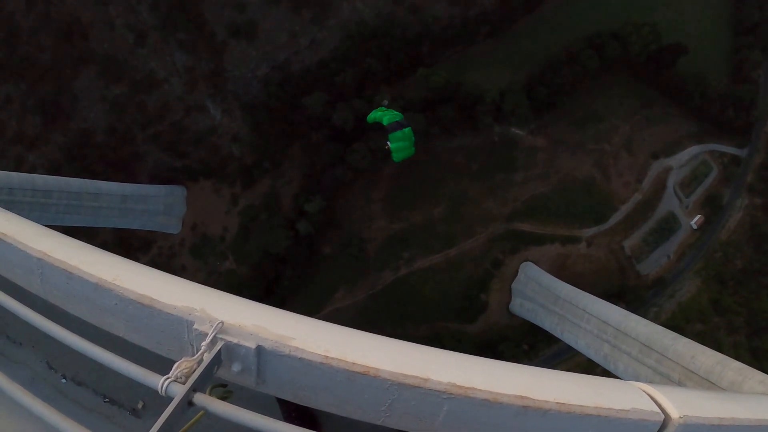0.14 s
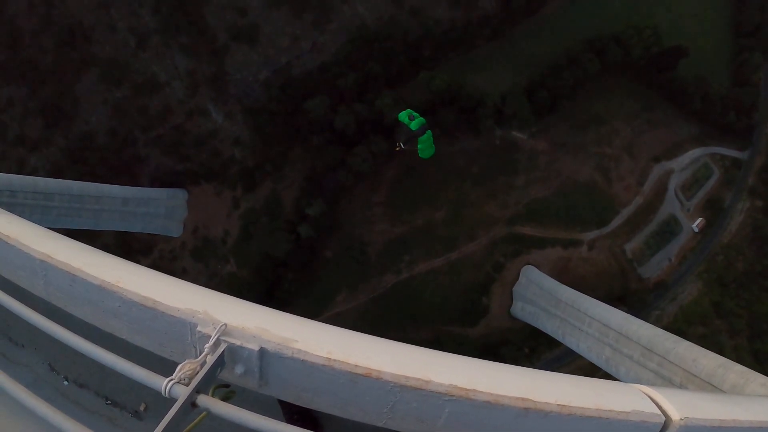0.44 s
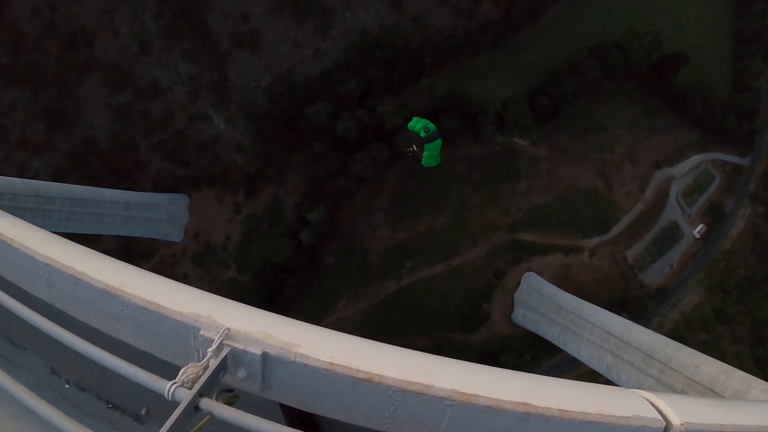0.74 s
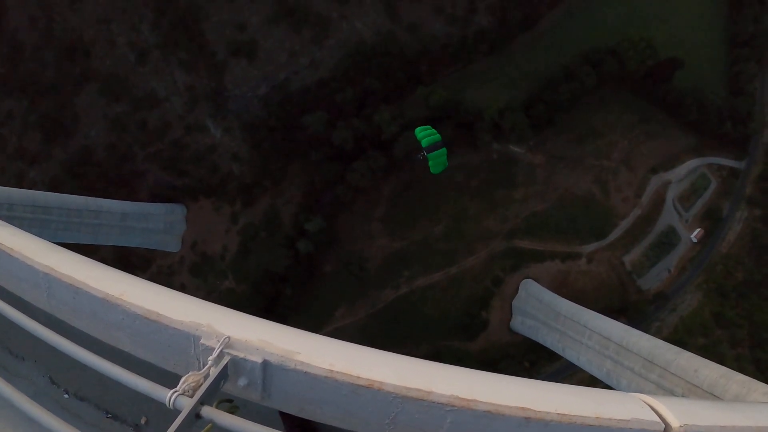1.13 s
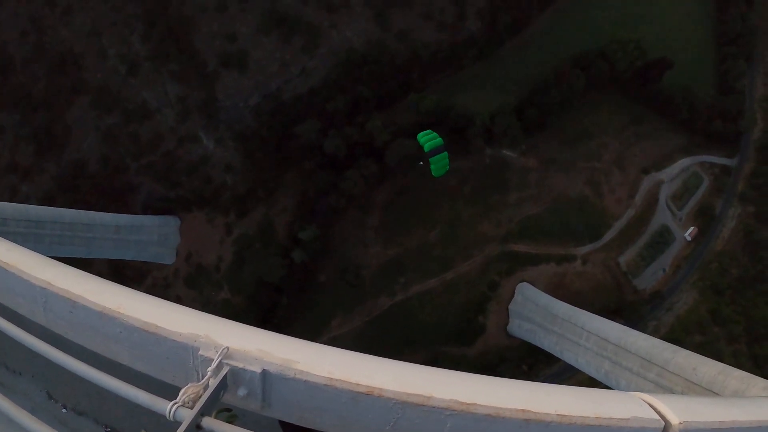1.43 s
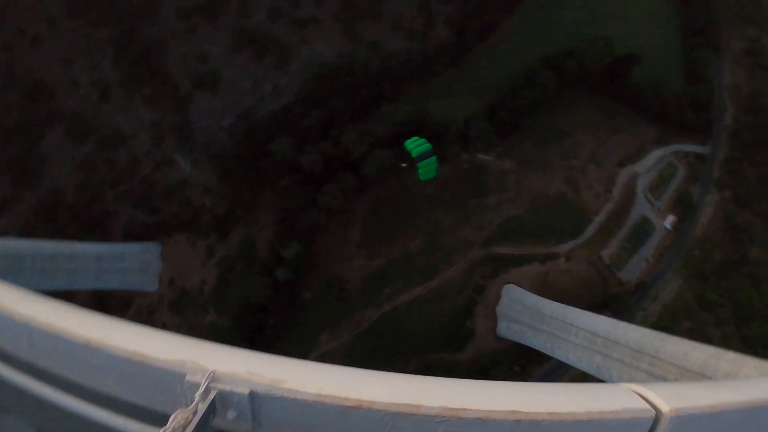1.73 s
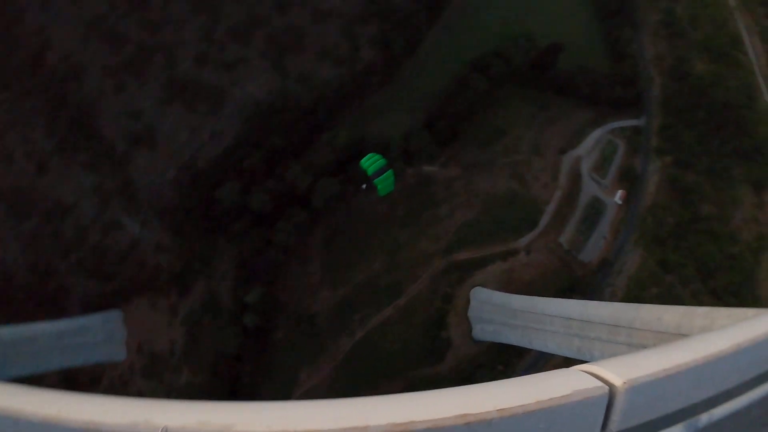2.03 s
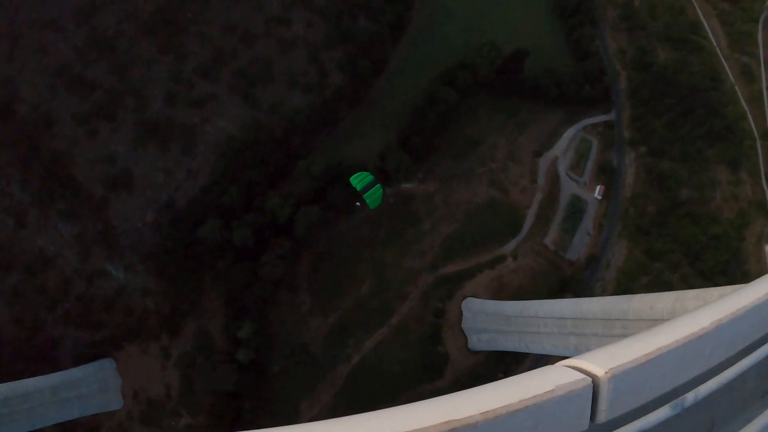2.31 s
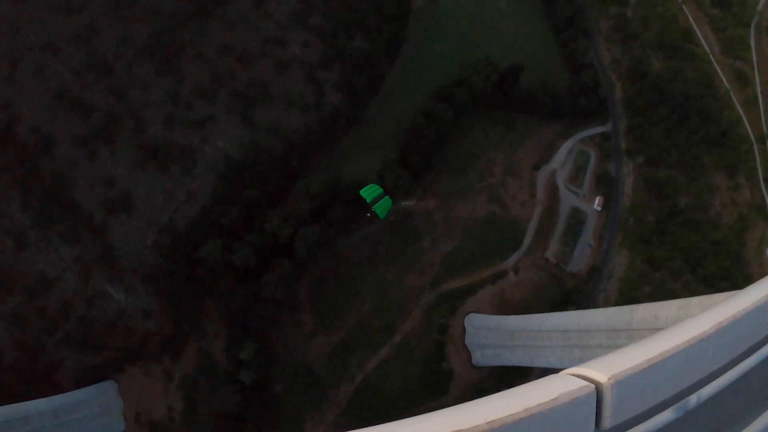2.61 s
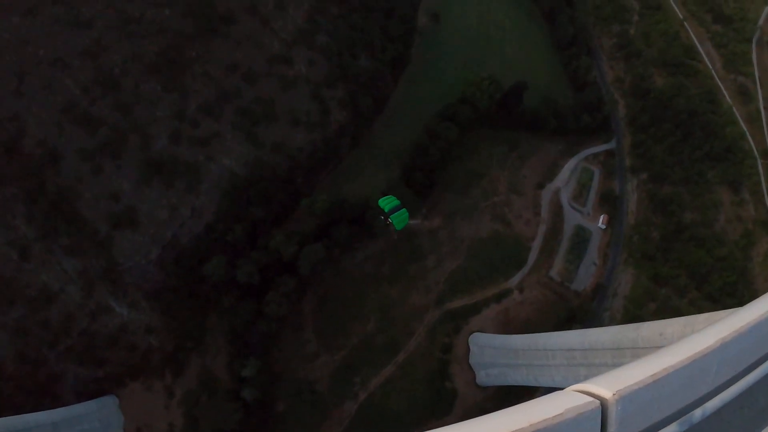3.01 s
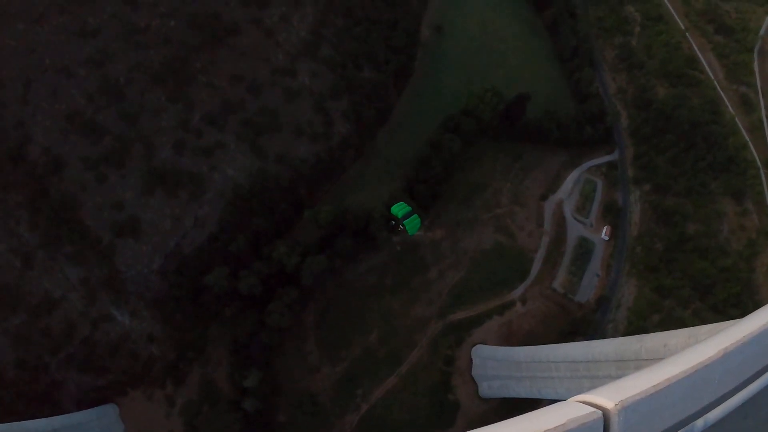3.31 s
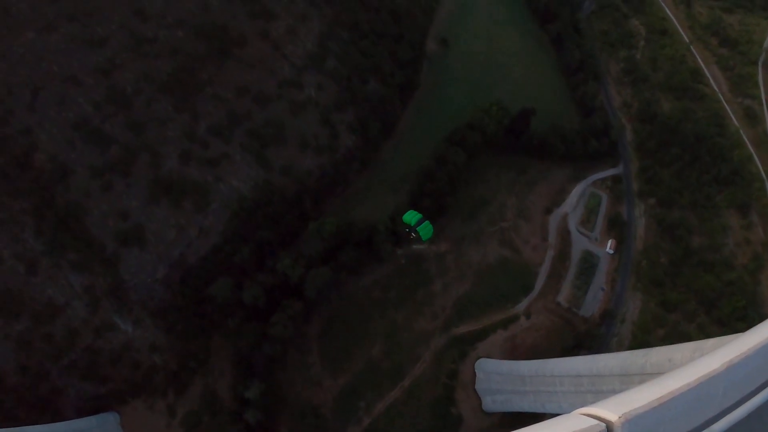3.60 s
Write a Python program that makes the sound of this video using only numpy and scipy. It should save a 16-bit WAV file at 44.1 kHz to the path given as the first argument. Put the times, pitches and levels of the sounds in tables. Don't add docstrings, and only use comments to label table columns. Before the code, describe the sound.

Parachute canopy cracks open with a brief flapping roar, then tyre hiss and low bridge drone.

```python
import sys
import numpy as np
from scipy import signal
from scipy.io import wavfile
from scipy.ndimage import uniform_filter1d, map_coordinates

SR = 44100
rng = np.random.default_rng(int(sys.argv[2]) if len(sys.argv) > 2 else 0)


def master(y):
    cut = np.clip(np.atleast_2d(y).T, -1, 1)
    pcm = np.round(cut * 32767)
    wavfile.write(sys.argv[1], SR, pcm.astype(np.int16))


def linear_from_db(decibels):
    return 10 ** (np.asarray(decibels, float) / 20)


N = 165375

# start_s, level_db
CANOPY_OPENING = [
    (0, -48),
    (.1, -42),
    (.245, -26.5),
    (.325, -21.5),
    (.352, -22.5),
    (.38, -24),
    (.485, -30.5),
    (.525, -38),
    (.8, -62),
]
# freq_hz, density_db (per Hz)
ROAR_COLOUR = [(50, -8.5), (200, -6), (400, -10), (1100, -12.5), (2400, -22), (3500, -21.5), (7500, -33.5),
               (15000, -41)]
# freq_hz, likeness (1 = same)
ROAR_LIKENESS = [(60, 1), (250, 0.99), (1000, 0.97), (3000, 0.9), (5000, 1), (7000, 0.32), (10000, .02)]
# centre_s, lift_db
CLOTH_WHIPS = [(0.138, 3), (0.155, 5), (.172, 3), (.192, 4.5), (0.226, 2.5), (0.239, 3.5), (0.254, 5.5),
               (0.271, 6), (.292, 2), (0.315, 5), (0.326, 2.5), (0.336, -2.5), (0.362, -2), (.375, 3.5),
               (0.39, 3.5), (0.401, -1), (0.423, 4.5), (0.438, -1.5), (0.458, 3), (0.482, 2.5), (.495, -2),
               (0.511, 1.5), (0.551, 4), (0.586, 3.5), (0.604, 3.5), (.634, 2)]
# freq_hz, width_hz, gain_db
ROAR_RIDGES = [
    (742, 170, -3),
    (926, 83, 3),
    (1407, 150, -8.5),
    (1590, 150, 1),
    (2083, 160, -3.5),
    (2750, 310, 4),
]
# crest_s, peak_db, pitch_hz
CELL_SLAMS = [(.065, -21.5, 292), (.1932, -7, 241), (.198, -5.5, 220), (.211, -16, 300), (.225, -19, 200),
              (0.2435, -1.5, 230), (0.263, -26, 250), (0.2659, -0.5, 183), (0.2841, 0, 210),
              (0.2919, -4.5, 280), (0.2975, -7, 280), (.305, 2, 210), (0.311, -7, 200), (0.3156, -5, 220),
              (0.3206, -3.5, 220), (.334, -2.5, 182), (0.369, -13, 250), (0.373, -8.5, 240),
              (0.38, -5.5, 225), (0.385, -7.5, 250), (0.406, -11.5, 139), (0.429, -22, 180),
              (0.569, -29, 150), (0.599, -23.5, 180)]
# start_s, peak_db, pitch_hz, pan_db (left over right)
CLOTH_SNAPS = [(0.041, -33, 2550, 1), (.068, -50, 2520, -5), (.097, -31, 2800, 5), (0.251, -19, 2670, 8),
               (0.4, -13.5, 5000, 3), (.459, -8.5, 3290, 5), (0.545, -32, 2750, 5), (0.604, -25.5, 2480, 3),
               (0.66, -37, 4200, -4), (0.693, -34, 3630, -5), (0.738, -36, 2600, 2), (0.81, -47, 6720, .4),
               (0.831, -39, 3960, -8), (0.8546, -31, 1107, 1), (1.233, -42, 5400, -1),
               (1.383, -35, 2950, 1.1), (2.212, -38.5, 4750, 6.5), (2.301, -46, 4300, 11),
               (2.448, -38, 2080, 2), (2.467, -33.5, 4620, 0.5), (2.4669, -36, 3000, -1),
               (2.466, -41, 9300, 1), (.634, -35, 1710, -3)]
# start_s, level_db, brightness_db, top_air_db, pan_db (left over right), tread_hum_db
PASSING_CARS = [(0, -38, -21, 9.5, 0.5, 0.5), (.6, -35, -10, 3.5, -1.5, -4), (.8, -47, -2, 8, 7.5, 0),
                (1.4, -41, -1.5, 12.5, 7.5, -5.5), (1.68, -40, 1.5, 7, 11, 0), (1.8, -40, 0, -2, 11, 3.8),
                (1.95, -38, -1, 6.5, 8, 5), (2.15, -38, 1.5, 9.5, 8, 1.5), (2.5, -37.5, -3, -6, 6.5, -4.5),
                (2.9, -39, -5, -14.5, 6, 1), (3.15, -36.5, -2.5, -1, 5.5, -3), (3.3, -36, 0, -4, 6, -2.5),
                (3.42, -36, 3, 5, 6, -1), (3.58, -36.5, 1.5, 1, 7, -3), (3.75, -36, -0.5, -1.5, 6.5, 1)]
# freq_hz, density_db (per Hz)
TYRE_COLOUR = [(300, -5), (560, -10), (900, -4.5), (1400, -10), (1900, -10), (2500, -14), (4000, -25),
               (5900, -39.5), (7400, -31.5), (8600, -38.5), (12000, -53)]
# freq_hz, likeness (1 = same)
TYRE_LIKENESS = [(300, 0.99), (1000, 0.61), (2400, 0.55), (4000, 0.27), (6000, 0.57)]
# start_s, level_db
DECK_LOAD = [(0, -34.5), (.6, -33.5), (.75, -40), (.9, -36.5), (1.3, -35.5), (1.8, -33.5), (2.15, -32.5),
             (2.3, -33), (2.42, -30.5), (2.6, -31), (3.0, -28.5), (3.25, -31), (3.5, -31.5), (3.75, -29.5)]
# freq_hz, density_db (per Hz)
DECK_COLOUR = [(15, -42.5), (25, -13.5), (92, 0), (205, -7.5), (242, -8.5), (348, -17), (379, -13.5),
               (500, -23), (650, -46), (1100, -120)]
# start_s, level_db
PORT_GUSTS = [(0, -30), (.25, -56), (.45, -50), (1.6, -57), (1.8, -47.5), (2.3, -53), (2.45, -27),
              (2.75, -33.5), (3.0, -50), (3.1, -56), (3.75, -66)]

PORT_CUT_HZ = 7720


def canopy():
    roar_db, echo_s = 11, 0.67
    t = np.arange(N) / SR
    level_db, = in_time(CANOPY_OPENING)
    top_db = level_db.max()

    first_flap_s, flap_gap_s, loose_db, loose_until_s = 0.04, 0.0425, 5, 0.11
    looseness = np.clip(3 - 3 * t / loose_until_s, 0, 1)
    level_db = level_db + loose_db * looseness * np.cos(2 * np.pi * (t - first_flap_s) / flap_gap_s)
    whip_s = 0.007
    level_db = level_db - 1.5 + sum(db * np.exp(-((t - s) / whip_s) ** 2) for s, db in CLOTH_WHIPS)

    floor_db, = in_time(CANOPY_OPENING, echo_s)
    floor_db = top_db + 1.7 * (floor_db - top_db) - 60 * (t < echo_s)
    slopes_db, slopes_from_s, fade_db_per_s = -6.5, 0.9, 12.5
    slope_rate = np.where(t > slopes_from_s, fade_db_per_s, -100.0)
    wash_db = top_db + slopes_db - slope_rate * (t - slopes_from_s)
    return_db = 10 * np.log10(linear_from_db(2 * floor_db) + linear_from_db(2 * wash_db))

    thumps = slams()
    smear_s, lag = 0.027, np.arange(int(0.1 * SR))
    smear = rng.standard_normal(len(lag)) * np.exp(-lag / (smear_s * SR))
    smeared = signal.fftconvolve(thumps, smear / np.linalg.norm(smear))[:N]
    returned_thumps = np.roll(smeared, int(echo_s * SR))
    echo = band(roar(return_db + roar_db) + returned_thumps, 221, 1630, order=1)

    direct = roar_ridges(roar(level_db + roar_db)) + thumps
    return later(direct + linear_from_db(-17) * echo, 0.000033)


def roar(level_db):
    flaps_per_s, flap_db = 140, 1.35
    air = rms_one(banded(ROAR_COLOUR, ROAR_LIKENESS, flap_db * drift(flaps_per_s), own_db=1.5))

    crackles_per_s, spread_db, crackle_db = 830, 3.2, -14.5
    happens = rng.random(N) < crackles_per_s / SR
    strength = linear_from_db(spread_db * np.minimum(rng.exponential(1, N), 4))
    creases = happens * strength * rng.choice([-1, 1], N)
    crackle = band(creases + 1e-18, 2200, 6000)
    return linear_from_db(level_db) * (air + linear_from_db(crackle_db) * rms_one(crackle))


def slams():
    cycles = 1.28
    out = np.zeros(N)
    for crest_s, peak_db, pitch_hz in CELL_SLAMS:
        phase = np.arange(int(cycles * SR / pitch_hz)) * pitch_hz / SR - cycles / 2
        rounding = np.abs(np.cos(np.pi * phase / cycles)) ** 0.5
        start = int((crest_s + phase[0] / pitch_hz) * SR)
        out[start:][:len(phase)] += linear_from_db(peak_db) * np.cos(2 * np.pi * phase) * rounding
    return out


def roar_ridges(x):
    for freq_hz, width_hz, gain_db in ROAR_RIDGES:
        w, a, g = 2 * np.pi * freq_hz / SR, np.pi * width_hz / SR, linear_from_db(gain_db / 2)
        x = signal.lfilter([1 + a * g, -2 * np.cos(w), 1 - a * g],
                           [1 + a / g, -2 * np.cos(w), 1 - a / g], x)
    return x


def snaps():
    fade_cycles, rise_cycles, grit_db = 22, 1.5, -4
    out, t = np.zeros((2, N)), np.arange(512) / SR
    for start_s, peak_db, pitch_hz, pan_db in CLOTH_SNAPS:
        grit = signal.lfilter(*signal.iirpeak(pitch_hz, 1.2, SR), rng.standard_normal(len(t)))
        grit = rms_one(low(grit, 1.3 * pitch_hz))
        rise = 1 - np.exp(-t * pitch_hz / rise_cycles)
        fade = 2 * rise * linear_from_db(-60 * t * pitch_hz / fade_cycles)
        ring = np.sin(2 * np.pi * pitch_hz * t) + linear_from_db(grit_db) * grit
        out[:, int(start_s * SR):][:, :len(t)] += linear_from_db(peak_db) * left_right(pan_db) * fade * ring
    return out


def traffic():
    level_db, tilt_db, air_db, pan_db, tread_db = in_time(PASSING_CARS)
    hiss = banded(TYRE_COLOUR, TYRE_LIKENESS, 0.5 * drift(12), 0.5, tilt_db, air_db, tread_db)
    hiss = later(rms_one(hiss), 0.000078)
    shaded = signal.sosfiltfilt(signal.butter(2, 4200, fs=SR, output="sos"), hiss)
    return linear_from_db(level_db) * (hiss + (left_right(pan_db) - 1) * shaded)


def deck():
    level_db, = in_time(DECK_LOAD)
    drone = banded(DECK_COLOUR, [(60, 1.0), (300, 1.0)], 1.4 * drift(3.4), own_db=2.0)
    return linear_from_db(level_db) * rms_one(drone)


def wind():
    likeness, lump_db, pan_db, cut_hz = 0.91, 2, 10, 56
    level_db, = in_time(PORT_GUSTS)
    noise = rng.standard_normal((3, N))
    noise = likeness * noise[2] + (1 - likeness) * noise[:2]
    noise = signal.sosfilt(signal.butter(2, 25, "high", fs=SR, output="sos"), noise)
    lumps = linear_from_db(lump_db * np.array([drift(16), drift(7.3)])) * left_right(pan_db)
    return linear_from_db(level_db) * lumps * rms_one(low(noise, cut_hz))


def capsule_hiss():
    noise = rng.standard_normal((2, N))
    return linear_from_db(-95) * rms_one(signal.lfilter(*signal.iirpeak(7200, 3, SR), noise))


def banded(spectrum, likeness, shared_db, own_db, tilt_db=0, air_db=0, tread_db=0):
    out, edges = 0, 22 * 2 ** np.arange(0, 9.7, 1 / 3)
    white = rng.standard_normal((2, 2, N))
    for k, (lo, hi) in enumerate(zip(edges, edges[1:])):
        hz = np.sqrt(lo * hi)
        if not spectrum[0][0] / 2 < hz < spectrum[-1][0] * 1.5:
            continue
        mid, side = band(white[k % 2], lo, hi, order=3)
        alike = np.clip(at_hz(likeness, hz), -1, 1)
        level_db = at_hz(spectrum, hz) + shared_db + own_db * drift(8.9)
        level_db = level_db + 2 * tilt_db * hump(hz, 2600, 0.41)
        level_db = level_db + air_db * (hump(hz, 5230, 0.39) + (hz > PORT_CUT_HZ * 1.122))
        level_db = level_db + tread_db * hump(hz, 1130, 0.2)
        stereo = np.sqrt(1 + alike) * mid + np.sqrt(1 - alike) * side * [[1], [-1]]
        out = out + linear_from_db(level_db) * stereo
    return out


def hump(hz, centre_hz, octaves):
    return np.exp(-(np.log2(hz / centre_hz) / octaves) ** 2)


def rms_one(x):
    return x / np.sqrt(np.mean(x ** 2) + 1e-20)


def in_time(rows, late_s=0):
    s, *columns = np.transpose(rows)
    return [np.interp(np.arange(N) / SR - late_s, s, c) for c in columns]


def at_hz(points, hz):
    freq_hz, value = np.transpose(points)
    return np.interp(np.log(hz), np.log(freq_hz), value)


def drift(rate):
    r = np.exp(-80 * np.pi * rate / SR)
    slow = signal.lfilter([1], [1, -2 * r, r * r], rng.standard_normal(N // 40 + 2002))[2000:]
    return np.interp(np.arange(N) / 40, np.arange(len(slow)), rms_one(slow))


def low(x, hz, order=2):
    return signal.sosfilt(signal.butter(order, min(hz, 0.45 * SR), fs=SR, output="sos"), x)


def band(x, low_hz, high_hz, order=2):
    return signal.sosfilt(signal.butter(order, [low_hz, high_hz], "band", fs=SR, output="sos"), x)


def left_right(pan_db):
    return linear_from_db(pan_db * np.array([[0.5], [-0.5]]))


def later(x, lag_s):
    return np.array([map_coordinates(x[0], [np.arange(N) - lag_s * SR], order=3), x[1]])


def scene():
    return canopy() + snaps() + traffic() + deck() + wind() + capsule_hiss()


def band_limit(x):
    return signal.sosfilt(signal.butter(12, 15600, fs=SR, output="sos"), x)


def record(dry):
    knee_db, squeeze, release_db_per_s, grab_s = -19, 0.59, 10.5, 0.036
    power = uniform_filter1d(np.mean(dry ** 2, 0), int(0.15 * SR))
    over_db = np.maximum(10 * np.log10(power + 1e-12) - knee_db, 0)
    ramp_db = release_db_per_s * np.arange(N) / SR
    held_db = np.maximum.accumulate(squeeze * over_db + ramp_db) - ramp_db
    r = np.exp(-1 / (grab_s * SR))
    x = dry * linear_from_db(-signal.lfilter([1 - r], [1, -r], held_db))

    ceiling = 0.95
    x = ceiling * np.tanh(x / ceiling)
    steep = signal.cheby2(12, 60, PORT_CUT_HZ * 1.13, fs=SR, output="sos")
    x = signal.sosfilt(steep, x) + linear_from_db(-15) * low(x, 8000)
    return band_limit(x)


dry = scene()
out = record(dry)
master(out)
```